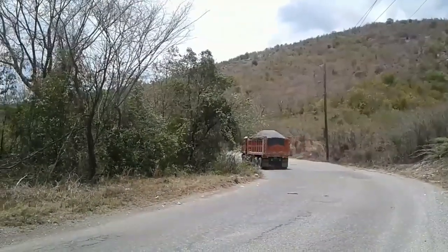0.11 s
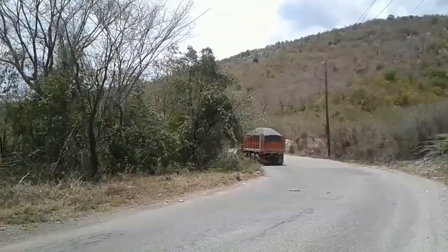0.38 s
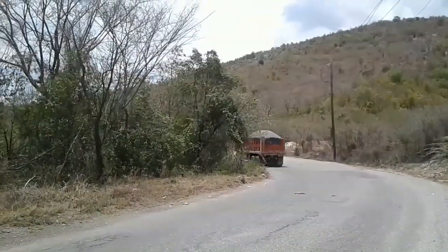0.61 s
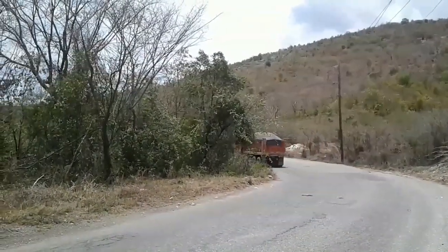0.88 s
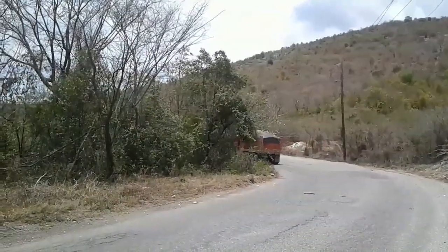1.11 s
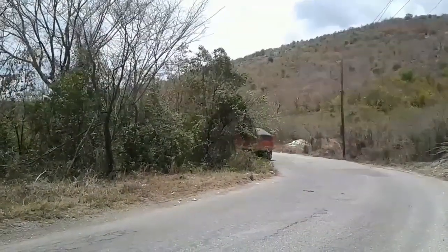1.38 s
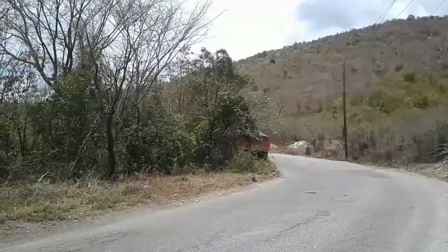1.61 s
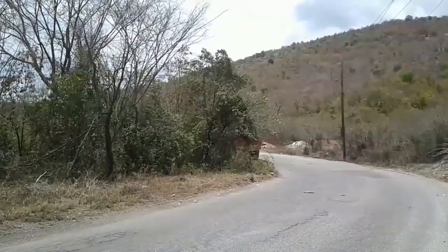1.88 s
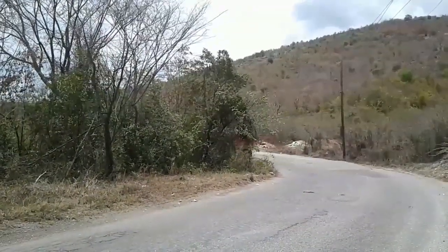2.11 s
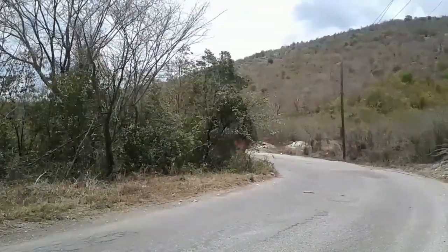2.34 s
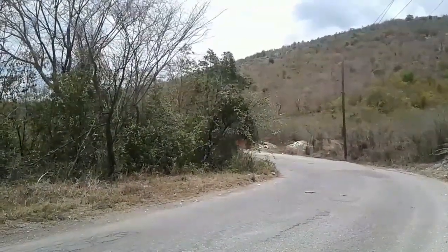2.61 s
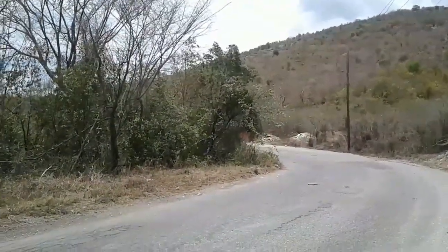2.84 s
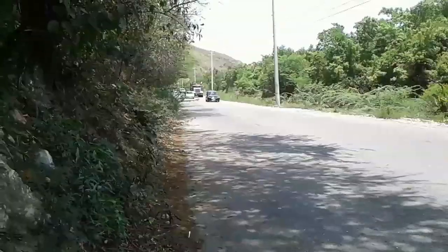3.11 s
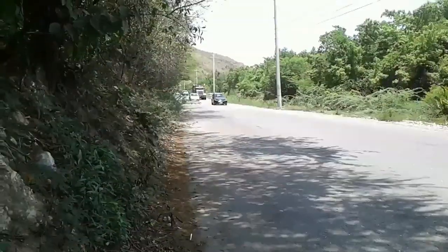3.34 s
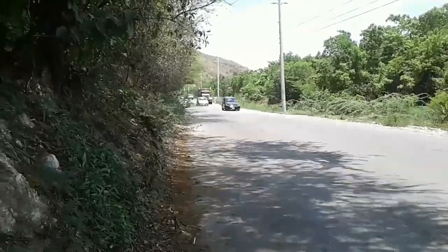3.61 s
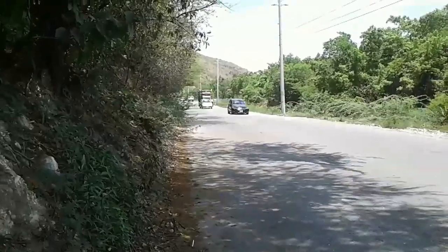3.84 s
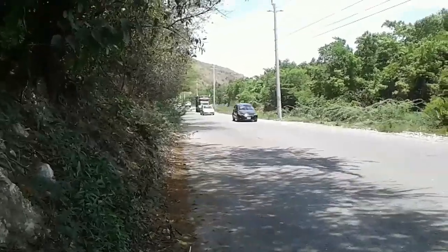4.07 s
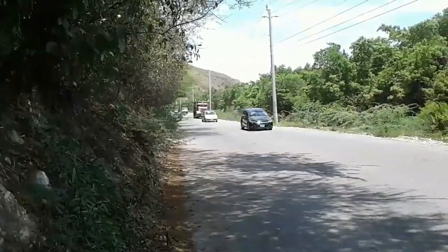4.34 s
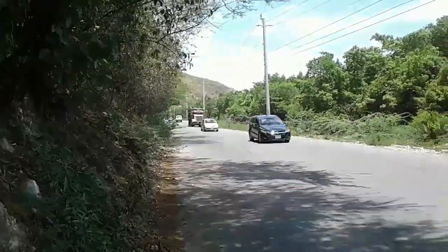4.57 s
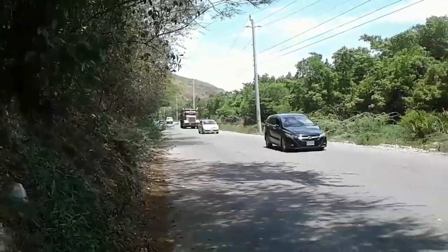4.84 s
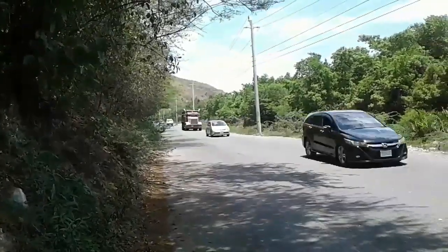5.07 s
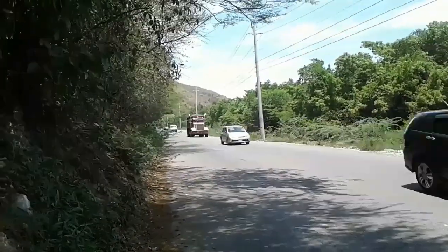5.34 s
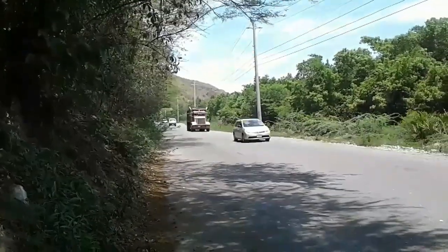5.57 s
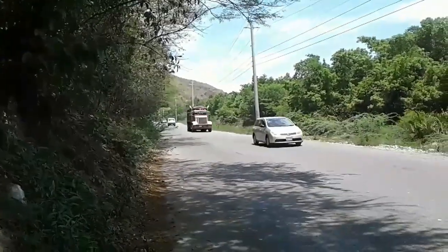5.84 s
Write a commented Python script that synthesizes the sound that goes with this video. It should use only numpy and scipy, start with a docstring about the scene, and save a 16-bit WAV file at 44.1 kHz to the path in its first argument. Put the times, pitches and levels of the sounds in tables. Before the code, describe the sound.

A loaded diesel truck throbs away with body thumps, a short silence, then engine-brake stutter and a car whooshing past left to right.

```python
"""A roadside, heard as two scenes with a short silence between. A loaded diesel truck pulls away, its body
bumping: exhaust puffs shaped by a pipe, noise for road and drone, wavering drive-line tones, brief low thumps
that swell and fade evenly. Then the second scene fades in, and a truck under engine brake sets in with uneven
puffs, while a car of shaped tyre noise and gliding bands passes left to right. Rasps, rattles and grit are
short noise swells; wind and microphone hiss are noise at each port. An inverted ground echo combs the sound;
two spaced microphone ports hear it a little apart."""
import sys
import numpy as np
from scipy import signal
from scipy.fft import rfft, irfft, next_fast_len
from scipy.io import wavfile
from scipy.ndimage import uniform_filter1d, map_coordinates

SR = 44100
rng = np.random.default_rng(int(sys.argv[2]) if len(sys.argv) > 2 else 0)


def field_ratio(decibels):
    """Amplitude ratio for a level in dB (20 dB per decade); scalars and array-likes work."""
    return 10 ** (np.asarray(decibels, dtype=float) / 20)


def transcribe(u):
    """Save the signal u as a 16-bit wav file named by the first command-line argument.

    u: samples, shape (n,) or (channels, n), limited to [-1, 1]; the rate is SR.
    q: integer samples, one column per channel.
    """
    v = np.clip(np.atleast_2d(u).T, -1, 1)
    q = np.round(v * 32767).astype(np.int16)
    wavfile.write(sys.argv[1], SR, q)


N = 262395
TIME = np.arange(N) / SR

# The spectra below give relative levels: sounds shaped by them are brought to rms 1, then set in level.
# Firing rate of the leaving truck's engine: t/s, rate/Hz
LEAVING_RATE = [(0, 54.3), (.35, 60.2), (.6, 67), (.75, 58.4), (1.2, 56), (1.85, 58.3), (2.02, 51.8),
                (2.4, 49), (2.6, 45), (2.93, 48.7)]
# Strength of each cylinder in firing order: level/dB
LEAVING_CYLINDERS = [1, -2.5, 1, 1, -3.5, -1.5]
ONCOMING_CYLINDERS = [0, 0, -10, 0, -7, -6]
# Colour each exhaust pipe gives its puffs: f/Hz, level/dB
LEAVING_PIPE = [(20, -39.5), (60, 1.5), (110, 2), (185, 5), (300, -3.5), (500, -19.5), (1000, -78),
                (3000, -92.5)]
ONCOMING_PIPE = [(30, -55), (70, -3.5), (140, -5), (215, 2.5), (290, -4.5), (400, -6.5), (750, -14),
                 (1500, -73), (4000, -100)]
# Spectra of the far road and the drive-line drone: f/Hz, level/dB
FAR_ROAD = [(150, -1.5), (400, 1), (600, 1), (1000, -1.5), (1500, -7.5), (2500, -9.5), (4500, -15.5),
            (6000, -23.5), (7500, -34.5), (12000, -35.5), (15700, -36.5)]
DRONE = [(450, -33), (600, -6.5), (700, -2.5), (800, 4.5), (950, -32), (1500, -74)]
# Wavering tones of the leaving truck's drive line: f/Hz, level/dB, from t/s, to t/s
WHINES = [(188, -38.5, 0.8, 2.5), (178, -41, .2, .85), (305, -47, 1.0, 1.9), (462, -50, -.2, .55),
          (120, -44, .5, 1.2), (152, -43, 2.1, 2.7), (555, -52, 1.2, 1.85), (610, -52, 0.9, 1.5),
          (663, -49.5, 0.86, 3.5), (742, -51, 0.85, 1.3), (778, -49.5, 1.3, 3.6), (882, -56, 0.802, 2.44)]
# Body thumps: t/s, level/dB, f/Hz
BUMPS = [(0.068, -18, 165), (0.134, -20, 250), (0.147, -26.5, 430), (.99, -32.5, 390), (1.295, -22.5, 310),
         (1.318, -21, 185)]
# Loose load shakes: t/s, level/dB, length/s
RATTLES = [(.26, -34.5, 0.021), (.13, -41, 0.053), (.36, -48.5, 0.018), (.62, -46, 0.014),
           (1.0, -44.5, 0.033), (1.41, -63, 0.013), (1.483, -58, 0.0045)]
# Short bright rasps in both scenes: t/s, level/dB, length/s
RASPS = [(.27, -50, .02), (.61, -48, .022), (.97, -54, .03), (3.66, -41, .025), (3.72, -43, .015),
         (4.66, -37, .012), (4.76, -41, .01)]
# Spectrum of a rasp: f/Hz, level/dB
RASP = [(1500, -30), (2500, -13), (3300, 5), (4100, -7), (6000, -21), (9000, -50)]
# Spectra of the steady microphone hiss, then the car's roar, rumble, hiss and tread whirr: f/Hz, level/dB
MIC_HISS = [(3000, -20), (6000, -4), (8000, 0), (12000, 0), (15700, -1)]
ROAR = [(15, -28), (60, -7), (150, -8), (300, -7), (500, -2), (800, -1.5), (1200, -3), (1500, -6),
        (2000, -44), (4000, -104)]
RUMBLE = [(18, -72), (35, -39), (54, -21), (108, -2.5), (215, 5.5), (339, -9.5), (450, -23.5), (580, -36),
          (990, -120)]
HISS = [(300, -70), (1200, -20), (2500, 2), (4000, -6.5), (5500, -12.5), (7200, -25), (9000, -31),
        (12000, -29), (15700, -39)]
TREAD = [(600, -62), (1200, -12), (1600, -0.5), (2200, -2.5), (2800, -18), (4000, -19), (8000, -100)]
# Car noise bands gliding with its bearing (tyres, tyres' upper band, engine):
# coming f/Hz, gone f/Hz, width/Hz, top level/dB, top t/s
GLIDES = [(690, 1170, 127, -15.5, 5.463), (1257, 1500, 590, -19.5, 5.13), (269.8, 205, 55, -17.5, 5.57)]
# Grit under the tyres: t/s, level/dB, length/s
SPRAYS = [(5.145, -44, 0.0093), (5.49, -47, 0.082)]
# Share of sound common to both ports, in the open and for the truck behind bushes: f/Hz, share/0-1
ALIKE = [(60, 1), (300, 0.99), (700, 0.96), (1400, 0.54), (3000, 0.27), (7000, 0.26), (15000, 0.05)]
SHELTERED = [(60, 1), (130, 0.79), (300, 0.96), (700, 1), (1400, 0.28), (3000, 0.13), (15000, 0.05)]
# Rough ground returns only lows: f/Hz, level/dB
SOIL = [(100, 0), (1500, -1), (3000, -3), (4500, -12), (8000, -60)]
# Colour difference of the ports: f/Hz, left minus right level/dB
PORTS = [(60, 0.5), (120, -1), (240, -0.5), (480, -1), (950, -1), (1890, -2.5), (3770, -0.5), (7520, 3.5),
         (15000, 1.5)]
# Lag of the left port, car coming and gone: lag/ms
LAG_MS = (-0.044, 0.31)
# Share of ground echo, car far and close: share/0-1; its fade from and to: t/s
ECHO = (.7, .05)
ECHO_FADES_S = (4.45, 5.45)
# Start and end of the second scene's even fade-in: t/s
FADE_S = (3.282, 3.646)

CYCLE = 6  # cylinders firing in turn
CUT_S = 2.935  # end of the first scene
EXHAUST_DB, CLATTER_DB = -33, -38  # leaving truck at the start
DOUBLE_S = 7  # time in which its distance doubles
AMBIENT = 0.37  # share of far road noise that stays as the truck leaves
DRONE_DB = -13  # over the exhaust
LOAD_S, LOAD_RISE_S, IDLE_DRONE = .9, .15, 0.23  # load taken up, rise time, share of drone before it
WHINE_WAVER_DB = 1.2
BUMP_S = .003  # length of a thump
MIC_HISS_DB = -69
HISS_PATCHY_DB = 1.1  # for tyre hiss and microphone hiss
PASS_S, REACH_S, ROAR_DB = 5.55, 0.49, -16  # nearest moment, nearest distance over speed, roar there
HISS_DB, RUMBLE_DB = -13.5, -7.5  # over the roar
TREAD_DB, TREAD_FAR_DB = -4.5, -11.5  # whirr over the roar: top, away from the top
TREAD_S, TREAD_SPAN_S = 4.76, 0.24  # when the whirr tops, and its spread
SING_HZ, SING_WIDTH_HZ, SING_DB = 735.5, 37, -10  # narrow tyre singing, over the roar
GRIT_PER_S, GRIT_SPREAD_DB, GRIT_DB = 500, 3.5, -20  # stones in the tread, over the roar
ABEAM_S, SWING_S = 5.44, .2  # car crosses the ports' axis; time its bearing takes to swing
GLIDE_RISE_DB_PER_S, GLIDE_FALL_DB_PER_S = 24, 22
BRAKE_S, BRAKE_DB = 3.65, -30  # engine brake start, level there
BRAKE_DRIFT_DB_PER_S = -0.2  # slow drift of the engine brake's level
BRAKE_HZ, SLOWING_HZ_PER_S = 73.3, 3.2  # firings per second and their fall


def unit(x):
    """Scale to rms 1."""
    return x / np.sqrt(np.mean(x ** 2) + 1e-20)


def curves(rows):
    """Draw one value per sample for each column after the time."""
    s, *columns = np.transpose(rows)
    return [np.interp(TIME, s, column) for column in columns]


def coloured(x, points):
    """Filter x through a spectrum of (Hz, dB) points on a log axis."""
    size = next_fast_len(N + 8192)
    hz, db = np.transpose(points)
    bins = np.fft.rfftfreq(size, 1 / SR)
    gain = field_ratio(np.interp(np.log(bins + 1), np.log(hz + 1), db))
    return irfft(rfft(x, size) * gain, size)[..., :N]


def wobble(rate):
    """A smooth random curve, rate knots a second."""
    knots = rng.standard_normal(int(N * rate / SR) + 4)
    return map_coordinates(knots, [TIME * rate])


def rush(points, patchy_db):
    """Three noises of rms 1 with patches of random gain: direct, and scattered at each port."""
    z = signal.stft(rng.standard_normal((3, N)), nperseg=512)[2]
    field = uniform_filter1d(rng.standard_normal(z.shape[1:]), size=5, axis=0)
    field = uniform_filter1d(field, size=10, axis=1)
    noise = signal.istft(z * field_ratio(patchy_db * unit(field)), nperseg=512)[1][:, :N]
    return unit(coloured(noise, points))


def delayed(x, ms):
    """x heard ms later; ms may change in time."""
    return map_coordinates(x, [np.arange(N) - ms * SR / 1000], order=3)


def engine(rate, cylinder_db, pipe, first_s, scatter_db, jitter_ms, rough):
    """One puff per firing, uneven by cylinder, mixed with rough pipe noise; also the firing phase."""
    turns = np.cumsum(rate) / SR
    turns = turns - np.interp(first_s, TIME, turns)
    at = np.flatnonzero(np.diff(np.floor(turns)) > 0)
    luck = rng.standard_normal((len(at), 2))
    cylinder = np.floor(turns[at + 1]).astype(int) % CYCLE
    strength = field_ratio(np.take(cylinder_db, cylinder) + scatter_db * luck[:, 0])
    place = np.clip(at + luck[:, 1] * jitter_ms * SR / 1000, 0, N - 1).astype(int)
    puffs = unit(coloured(np.bincount(place, strength, N), pipe))
    share = np.clip(rough, 0, 1)
    return np.sqrt(1 - share) * puffs + np.sqrt(share) * rush(pipe, patchy_db=0.0), turns


def bursts(rows, points):
    """Short noisy swells at given times."""
    swell = sum(field_ratio(db) * np.exp(-.5 * ((TIME - s) / length) ** 2) for s, db, length in rows)
    return swell * rush(points, patchy_db=3.5)


def band(hz, width_hz):
    """Narrow noise centred on a moving frequency: slow noise riding on a carrier."""
    slow = [(1, 0), (width_hz / 2, -3), (width_hz * 2, -40), (width_hz * 10, -120)]
    phase = 2 * np.pi * np.cumsum(hz) / SR
    in_phase = rush(slow, patchy_db=2.0) * np.cos(phase)
    quadrature = rush(slow, patchy_db=2.0) * np.sin(phase)
    return unit(in_phase + quadrature)


def grains(per_s, spread_db, points):
    """Random ticks of uneven size, rms 1."""
    struck = rng.random((3, N)) < per_s / SR
    sign = rng.choice([-1, 1], (3, N))
    size = field_ratio(spread_db * rng.exponential(size=(3, N)))
    return unit(coloured(struck * sign * size, points))


def ports(sound, lag_ms, echo_ms, echo, skew_ms, alike=ALIKE):
    """Direct sound and each port's scattered sound, both with the inverted ground echo."""
    share = [(hz, np.clip(s, .01, .99)) for hz, s in alike]
    direct = coloured(sound[0], [(hz, 10 * np.log10(s)) for hz, s in share])
    scattered = coloured(sound[1:], [(hz, 10 * np.log10(1 - s)) for hz, s in share])
    pair = []
    for side, own in zip((1, -1), scattered):
        heard = delayed(direct, side * lag_ms / 2) + own
        pair.append(heard - echo * delayed(coloured(heard, SOIL), echo_ms + side * skew_ms))
    return np.array(pair)


def leaving_exhaust_and_road(away):
    """Exhaust throb thinning with distance, over road clatter that beats with the firings."""
    exhaust, turns = engine(*curves(LEAVING_RATE), LEAVING_CYLINDERS, LEAVING_PIPE,
                            first_s=.01, scatter_db=2, jitter_ms=.3, rough=.55)
    beat = 1 + 0.062 * np.cos(2 * np.pi * turns)
    clatter = field_ratio(CLATTER_DB + 0.47 * wobble(9.54)) * beat * rush(FAR_ROAD, patchy_db=1.5)
    return away * field_ratio(EXHAUST_DB) * exhaust + (AMBIENT + (1 - AMBIENT) * away) * clatter


def drive_line_drone(away):
    """Noise drone of the drive line, coming in as the load is taken up."""
    load = np.interp(TIME, (LOAD_S - LOAD_RISE_S, LOAD_S), (IDLE_DRONE, 1))
    return away * load * field_ratio(EXHAUST_DB + DRONE_DB) * rush(DRONE, patchy_db=2.0)


def port_wind():
    """Low wind noise in uneven gusts, different at each port and growing in level."""
    gusts = field_ratio(-46 + 3.2 * TIME + 2.5 * np.array([wobble(7), wobble(7)]))
    return gusts * rush([(25, -25.0), (60, -10.0), (120, -10.5), (300, -32.0), (600, -62)], patchy_db=-3.5)[1:]


def drive_line_whines():
    """Drive-line sines that waver in level and pitch, ramped in and out."""
    whine = np.zeros(N)
    for hz, db, on, off in WHINES:
        ramp = np.clip(np.minimum(TIME - on, off - TIME) / 0.093, 0, 1)
        tone = np.sqrt(2) * np.sin(2 * np.pi * hz * (TIME + .0005 * wobble(5.5)))
        whine += field_ratio(db + WHINE_WAVER_DB * wobble(6.744)) * ramp * tone
    return whine


def body_thumps():
    """Low knocks of the truck body: sines under brief bell-shaped swells."""
    return sum(field_ratio(db) * np.exp(-.5 * ((TIME - s) / BUMP_S) ** 2) * np.sin(2 * np.pi * hz * (TIME - s))
               for s, db, hz in BUMPS)


def load_rattles():
    """Loose load shaking: broad noise swells, duller towards the top."""
    return bursts(RATTLES, [(200, -20), (450, 0), (1000, -3), (2000, -8), (4000, -15), (7000, -36), (15000, -50)])


def leaving_truck():
    """First scene: the truck behind bushes, its exhaust, drone and part of the road clatter fading over
    distance, and wind at the ports."""
    away = 1 / (1 + TIME / DOUBLE_S)
    sound = leaving_exhaust_and_road(away) + drive_line_drone(away) + drive_line_whines()
    sound = sound + body_thumps() + load_rattles() + bursts(RASPS, RASP)
    heard = ports(sound, lag_ms=-0.17, echo_ms=2.77, echo=0.0231, skew_ms=0.096, alike=SHELTERED)
    cut = np.clip((CUT_S - TIME) / 0.014, 0, 1)
    return cut * (heard + port_wind())


def microphone_hiss():
    """Steady microphone hiss in the treble, separate at each port."""
    return field_ratio(MIC_HISS_DB) * rush(MIC_HISS, HISS_PATCHY_DB)[1:]


def stirred_wind(roar_db):
    """Air stirred at each port, its low noise rising with the car's roar."""
    low = [(15, -50), (30, -23), (60, -22), (110, -17.0), (250, -43.5)]
    return field_ratio(0.35 * roar_db - 48) * rush(low, patchy_db=6.0)[1:]


def car_tyres(roar_db, gone, flutter):
    """Tyre roar and rumble, tread whirr, hiss, ticking stones and a singing that fades with the bearing."""
    near_top = np.exp(-.5 * ((TIME - TREAD_S) / TREAD_SPAN_S) ** 2)
    tread_db = TREAD_FAR_DB + (TREAD_DB - TREAD_FAR_DB) * near_top
    roar = rush(ROAR, patchy_db=1.2) * flutter
    treble = field_ratio(tread_db) * rush(TREAD, patchy_db=1.5) + field_ratio(HISS_DB) * rush(HISS, HISS_PATCHY_DB)
    stone = [(500, -27), (1200, 0), (2500, 0), (5000, -12), (8000, -41), (15000, -39)]
    stones = field_ratio(GRIT_DB) * grains(GRIT_PER_S, GRIT_SPREAD_DB, stone)
    sing = field_ratio(SING_DB) * (1 - gone) * band(np.full(N, SING_HZ), SING_WIDTH_HZ)
    rumble = field_ratio(RUMBLE_DB) * rush(RUMBLE, patchy_db=3.0)
    return field_ratio(roar_db + .6 * wobble(9)) * (roar + treble + stones + sing + rumble)


def car_glides(gone):
    """Bands of tyre and engine noise that glide as the bearing swings, rising to a top and falling."""
    car = 0
    for come_hz, gone_hz, width_hz, db, s in GLIDES:
        drop_db = np.maximum(GLIDE_RISE_DB_PER_S * (s - TIME), GLIDE_FALL_DB_PER_S * (TIME - s))
        car = car + field_ratio(db - drop_db) * band(np.interp(gone, (0, 1), (come_hz, gone_hz)), width_hz)
    return car


def braking_truck():
    """Engine-brake puffs at a falling rate; also the flutter they lend to the roar."""
    rate = BRAKE_HZ - SLOWING_HZ_PER_S * np.maximum(TIME - BRAKE_S, 0)
    exhaust, turns = engine(rate, ONCOMING_CYLINDERS, ONCOMING_PIPE,
                            first_s=3.704, scatter_db=2, jitter_ms=.2, rough=.1)
    brake = np.clip((TIME - BRAKE_S) / 0.0036, 0, 1)  # the brake closes
    flutter = 1 + .1 * brake * np.cos(2 * np.pi * turns)
    return brake * field_ratio(BRAKE_DB + BRAKE_DRIFT_DB_PER_S * (TIME - BRAKE_S)) * exhaust, flutter


def tyre_grit():
    """Grit sprayed under the tyres: very bright noise swells."""
    return bursts(SPRAYS, [(3000, -20), (6000, -2), (9000, 0), (15700, -2)])


def traffic():
    """Second scene: the far braking truck and the passing car, its echo fading and its lag swinging."""
    roar_db = ROAR_DB - 10 * np.log10(1 + ((TIME - PASS_S) / REACH_S) ** 2)
    gone = .5 + .5 * (TIME - ABEAM_S) / np.hypot(TIME - ABEAM_S, SWING_S)  # bearing: 0 coming, 1 gone
    truck, flutter = braking_truck()
    car = car_tyres(roar_db, gone, flutter) + car_glides(gone) + tyre_grit() + bursts(RASPS, RASP)
    lag_ms = np.interp(gone, (0, 1), LAG_MS)
    echo = np.interp(TIME, ECHO_FADES_S, ECHO)
    near = ports(car, lag_ms, echo_ms=2.102, echo=echo, skew_ms=0.11)
    far = ports(truck, lag_ms=-0.078, echo_ms=2.48, echo=1.0, skew_ms=0.058)
    return (near + far + stirred_wind(roar_db) + microphone_hiss()) * np.interp(TIME, FADE_S, (0, 1))


def scene():
    """The two scenes, one after the other."""
    return leaving_truck() + traffic()


def band_limit(x):
    """A steep low-pass at the top of the band."""
    return signal.sosfilt(signal.butter(12, 15800, fs=SR, output="sos"), x)


def record(dry):
    """The two ports differ in colour and round off the highest peaks."""
    pair = np.array([coloured(v, [(hz, side * db / 2) for hz, db in PORTS]) for v, side in zip(dry, (1, -1))])
    rounded = pair / (1 + np.abs(pair / .95) ** 6) ** (1 / 6)
    return band_limit(rounded)


dry = scene()
out = record(dry)
transcribe(out)
```